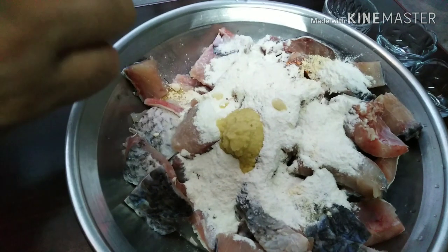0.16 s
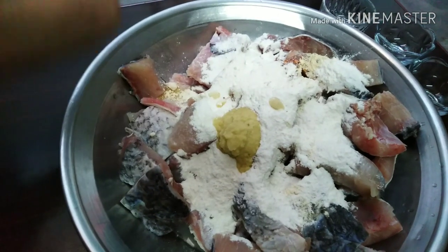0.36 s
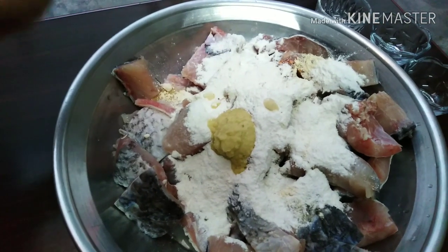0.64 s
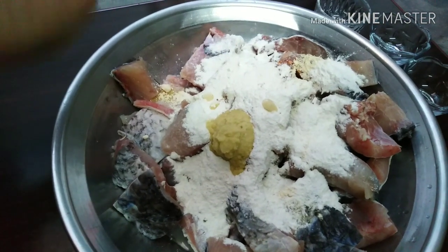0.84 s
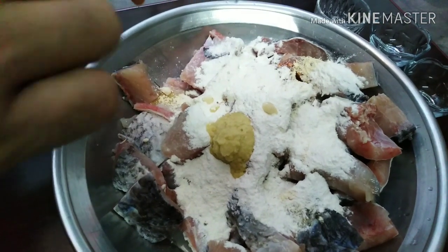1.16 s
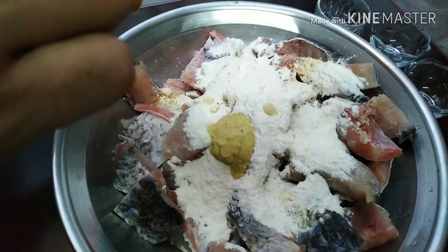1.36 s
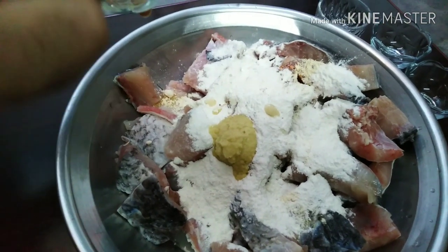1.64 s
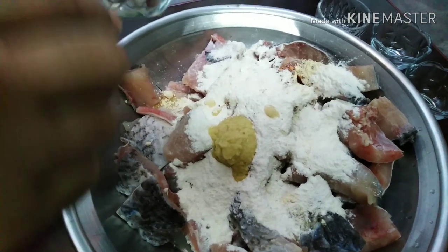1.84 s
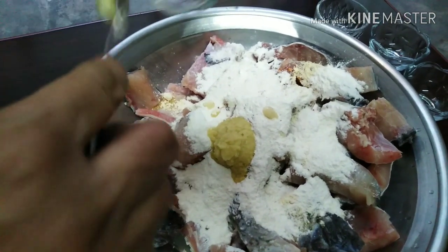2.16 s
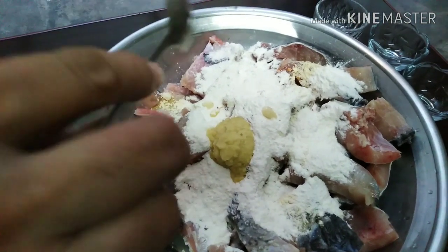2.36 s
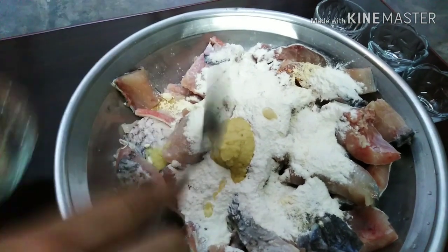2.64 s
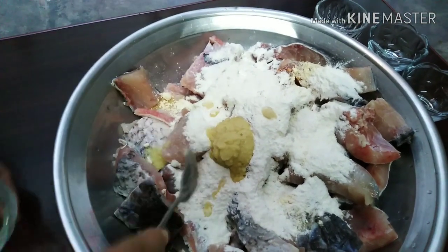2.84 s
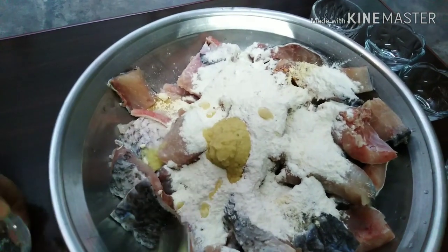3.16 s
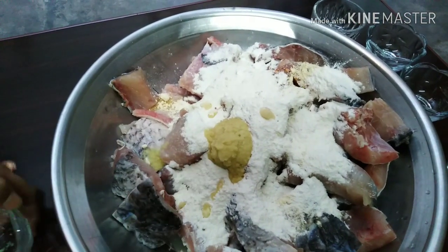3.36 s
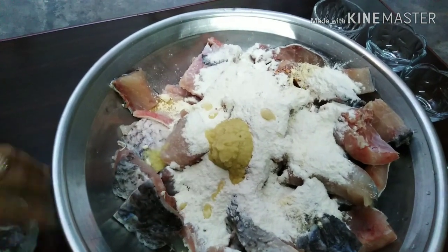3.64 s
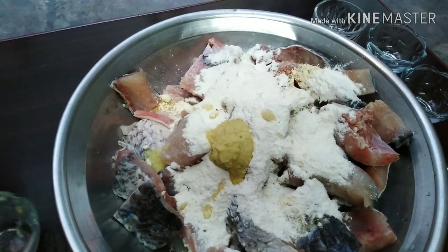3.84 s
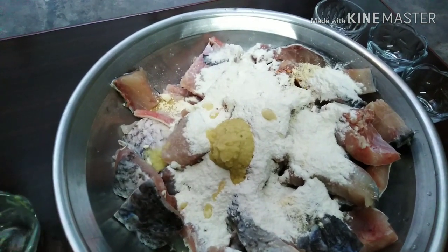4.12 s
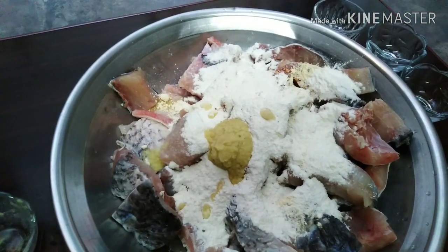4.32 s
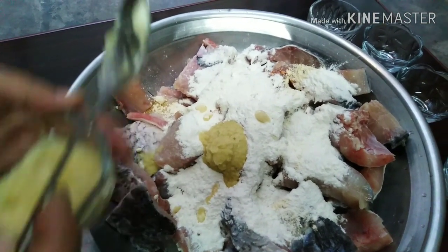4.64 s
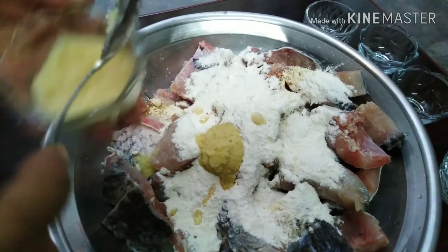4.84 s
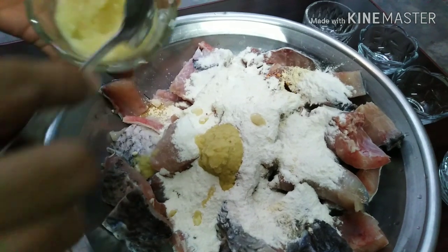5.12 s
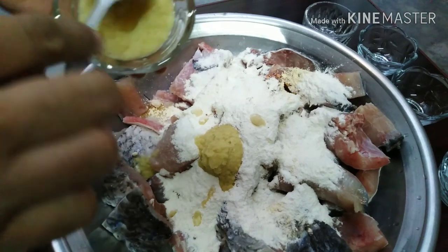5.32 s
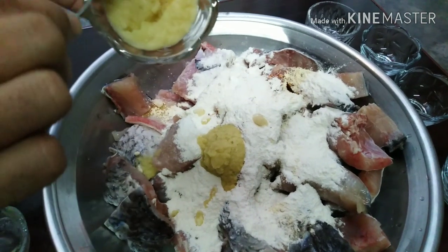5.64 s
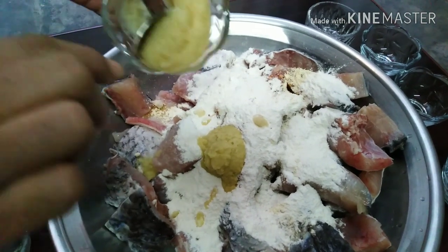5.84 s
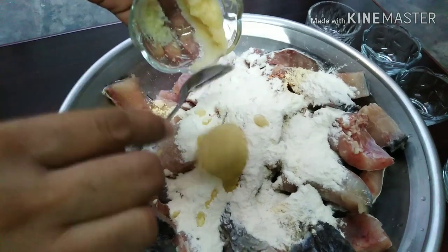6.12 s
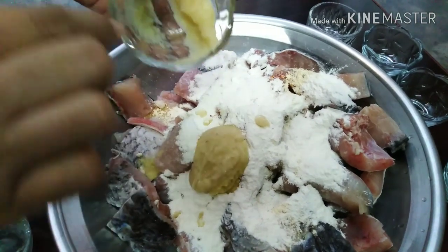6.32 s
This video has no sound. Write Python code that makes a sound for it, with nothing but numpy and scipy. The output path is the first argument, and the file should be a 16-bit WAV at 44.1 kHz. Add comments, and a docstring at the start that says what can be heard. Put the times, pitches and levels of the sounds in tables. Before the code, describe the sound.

A close microphone in a hard-walled kitchen picks up soft hiss, a low electrical hum and very faint passing tones. From the start until about 2.1 seconds, a steel spoon clinks on a small hand-held glass bowl around eight times, three or four per second. Each clink is bright and short, damped by fingers, with a little room echo, and sits somewhat to the right. After a quiet second, a light bump comes at 3.2 seconds. At 3.4 a vessel is set down on the table with a hollow knock, then rocks in quickening knocks until it rests at about 4.2. Following another pause, the spoon clinks on a fuller glass bowl at 5.2 and 5.4 seconds, trailing off in tiny ticks. A faint tick at 6.1 leads to one last sharp clink at about 6.3 seconds.

```python
"""A hard-walled kitchen, close to a two-port microphone.
A steel spoon clinks on a small hand-held glass bowl, later on a fuller one; each contact rings
glass and steel. Midway a vessel is set down on the table, knocks and rocks to rest.
A mains hum, a soft hiss and faint narrow tones that come and go fill the quiet."""
import sys
import numpy as np
from scipy import signal
from scipy.fft import rfft, irfft, next_fast_len
from scipy.io import wavfile
from scipy.ndimage import uniform_filter1d, map_coordinates

SR = 44100
rng = np.random.default_rng(int(sys.argv[2]) if len(sys.argv) > 2 else 0)


def wav_out(sig):
    """Save sig, one row per channel (or a flat mono array), as 16-bit PCM at SR to the path in sys.argv[1]."""
    wavfile.write(sys.argv[1], SR, np.round(np.clip(np.atleast_2d(sig).T, -1, 1) * 32767).astype(np.int16))


N = 285768

# kitchen decay: freq_hz, t60_s
ROOM_DECAY = [(150, .5), (500, 0.65), (1500, .5), (4000, .55), (9000, 0.52), (14000, 0.48)]
# reverb colour: freq_hz, gain_db
WALL_COLOUR = [(150, 10), (1000, 1.5), (4000, 2), (9000, -3), (14300, -5.5), (14600, -23.5)]
# left-right likeness of diffuse sound: freq_hz, coherence
COHERENCE = [(60, 1), (140, .98), (280, 0.64), (950, 0.11), (3770, 0.095), (15000, 0.069)]
# hiss spectrum: freq_hz, density_db
HISS_SPECTRUM = [(15, -48), (25, -21), (103, -0.5), (146, -9), (219, -2), (1310, -22), (1580, -20),
                 (1810, -17.5), (4750, -28.5), (7480, -32), (9020, -26), (13800, -32.5), (15000, -46.5)]
# faint tones: centre_s, pitch_hz, half_length_s, level_db
TONE_SWELLS = [(0.163, 650, 0.14, -69), (0.3, 746, 0.11, -65.5), (0.577, 214, 0.038, -57.5),
               (0.845, 473, 0.053, -66), (0.995, 682, .2, -71.5), (1.796, 472, 0.096, -60),
               (1.906, 460, 0.022, -59), (1.979, 720, 0.066, -64), (2.499, 206.7, 0.05, -61),
               (2.965, 1659, 0.14, -76.5), (4.485, 466, 0.034, -60), (4.558, 551, 0.037, -62.5),
               (4.7, 668, 0.17, -72), (2.026, 465, 0.07, -65), (2.482, 678, .1, -76),
               (4.92, 199, 0.043, -62.5), (4.832, 465, 0.095, -63), (5.03, 192.4, 0.047, -61),
               (5.231, 760, .12, -61), (5.47, 710, 0.11, -67), (6.454, 655, 0.1, -65)]
# tone position by pitch: pitch_hz, left_over_right_db
TONE_PAN = [(200, -13), (465, 10.5), (550, 10.5), (660, -13.5), (760, -19.5), (1600, 3)]
# vessel on table: start_s, level_db, boom_over_knock_db, clatter_over_knock_db,
# clatter_tilt_db_per_octave, contact_s
VESSEL_KNOCKS = [(3.182, -23, 6.5, -39.5, -1, 0.04), (3.444, -7, 2.5, -7.5, 2.5, 0.045),
                 (3.539, -19.5, -3.5, -14, 0.5, 0.022), (3.622, -23, -3, 1, 4, 0.038),
                 (3.693, -9.5, 0, -12.5, -2, 0.03), (3.782, -5.5, -2, -13.5, -0.5, 0.035),
                 (3.859, -11.5, -2, -17.5, -2, 0.033), (3.898, -20.5, -2, -17.5, 1, 0.021),
                 (3.943, -8.5, -2.5, -16, 0.2, 0.04), (4.004, -6.5, -2.5, -17.5, -1.5, 0.03),
                 (4.054, -8.5, -3.5, -19, -2, 0.039), (4.1, -11.5, -3, -18, -3, 0.035),
                 (4.143, -9.5, -4, -24.5, -2, 0.025), (4.175, -10.5, -4, -15, -4.5, 0.031),
                 (4.191, -14, -1.5, -14, -3.5, 0.02)]
# table resonances: centre_hz, width_hz, gain_db
TABLE_MODES = [(104.3, 48, -11.5), (154, 13, 0), (230, 81, 0.5), (320, 150, -4), (414.8, 35, 0.5),
               (635.4, 130, -6)]
# vessel resonances: centre_hz, width_hz, gain_db
VESSEL_MODES = [(826.7, 120, -8.5), (1010, 99, -5), (1277, 97, -11), (1600, 200, -15.5)]
# clatter spectrum: freq_hz, density_db
CLATTER_SPECTRUM = [(880, -11), (1500, -4), (2100, 2.5), (3060, -1), (4550, -13.5), (10900, -22),
                    (14600, -29), (16000, -82.5)]
# spoon on bowl: start_s, level_db, left_over_right_db, glass_over_spoon_db, lowest_glass_mode_db,
# lowest_spoon_band_db, tilt_db_per_octave
SPOON_CONTACTS = [(0.068, -13, -11.5, 2, -3.5, -5, -1.7), (0.256, -8, -11.5, 3, 4.5, -14, 0.5),
                  (0.4305, -1, -3, 0.5, -3, -2.5, 0.74), (0.739, -10, -13, -13.5, -7, 2, -3.5),
                  (1.03, -3.5, -9.5, -12, -1.5, 3, -2), (1.298, -6.5, 0, 4.5, -7.5, -7.5, -0.1),
                  (1.5648, -2, -8.5, -3, -6, -1.2, 0), (1.801, -54.5, -7, 13, 9.5, 0.1, 4.5),
                  (1.9054, -49.5, -6, -0.1, 23, 4, 9), (2.0889, -5, -10.5, -1, -3.5, -18, -1),
                  (2.291, -39.5, -11, -4, 0.8, 0.3, 16.5), (5.154, -10, -13.5, 3, -3, 10, 1.8),
                  (5.1682, -10.5, -9.5, 1, -1.7, 11, -1), (5.3751, -13, -15, 3, -2.5, -25, -1),
                  (5.412, -26, -10, -12, 8, -10.5, -5), (5.4974, -45.5, -20, 0.5, 7, 5.5, 1),
                  (5.5442, -32.5, -14, -6, 0.1, -3, 2), (5.6034, -56, -11, -1, 0.1, 0.1, 12),
                  (5.7244, -52, -11, -9, 0.1, 0.1, 7.5), (5.7916, -53.5, -11.5, -10, 0.1, 0.1, 18),
                  (6.1122, -29, -10.5, -12, -6, -6.5, 5.5), (6.337, -3.5, -5.5, 0, -9.5, -20, 1.35)]
# finger-damped glass modes: first_bowl_hz, fuller_bowl_hz, level_db, t60_s
BOWL_MODES = [(2740, 2650, -14, 0.03), (5740, 5630, -6, 0.014), (9600, 9530, -7, 0.011),
              (12600, 12500, -13, 0.008), (14200, 14200, -12, 0.006)]
# dense mode bands of the gripped, paste-laden spoon: low_hz, high_hz, level_db, t60_s
SPOON_BANDS = [(760, 920, -42, 0.04), (1197, 2400, -26.5, 0.016), (2780, 4000, -25.5, 0.0095),
               (4340, 5900, -20, 0.0092), (6610, 9100, -19.5, 0.014), (10000, 15000, -19, 0.011)]
# port imbalance: freq_hz, left_over_right_db
PORT_BALANCE = [(60, -.5), (400, .3), (800, -2), (2400, -2), (4400, 0), (8100, -7), (15000, -10)]
# microphone response: freq_hz, gain_db
MIC_RESPONSE = [(30, 0.5), (90, 5), (14300, 0.5), (15000, -14), (16000, -18.5), (16480, -37.5)]

HISS_DB, PATCHY_DB = -71.5, 3.5
HUM_HZ, HUM_DB = 98.7, -74.5
FLUTTER_DB, FLUTTER_PER_S = 6, 65
BOOM_DB, KNOCK_DB, CLATTER_DB = 4, 12, 9
CLATTER_PIVOT_HZ, CLINK_PIVOT_HZ = 3000, 6000
FULLER_BOWL_FROM_S, GLASS_SCATTER_DB = 4.8, 1.5
BAND_LIMIT_HZ = 16489


def amp(db):
    return 10 ** (np.asarray(db) / 20)


def unit_rms(x):
    return x / np.sqrt(np.mean(x ** 2) + 1e-20)


def along(points, hz):
    """Interpolate (freq_hz, value) points on a log axis."""
    knots_hz, values = np.transpose(points)
    return np.interp(np.log(hz + 1), np.log(knots_hz + 1), values)


def wobble(knots_per_s):
    """Smooth random curve, N samples."""
    knots = rng.standard_normal(int(N * knots_per_s / SR) + 4)
    return map_coordinates(knots, [np.arange(N) * knots_per_s / SR])


def filtered(x, response):
    """Apply a complex frequency response."""
    n = x.shape[-1]
    size = next_fast_len(n + 8192)
    return irfft(rfft(x, size) * response(np.fft.rfftfreq(size, 1 / SR)), size)[..., :n]


def highpass(x, corner_hz, order):
    return filtered(x, lambda hz: (1j * hz / (corner_hz + 1j * hz)) ** order)


def resonate(force, modes):
    """Drive parallel resonances of alternating sign."""
    return filtered(force, lambda hz: sum(
        (-1) ** k * amp(db) * 1j * hz * width_hz / (centre_hz ** 2 - hz ** 2 + 1j * hz * width_hz)
        for k, (centre_hz, width_hz, db) in enumerate(modes)))


def ring(hz, db, t60_s, t):
    """One decaying mode."""
    return amp(db - 60 * t / t60_s) * np.sin(2 * np.pi * hz * t) * (1 - np.exp(-t / 0.00035))


def add_in_kitchen(out, start_s, sound, pan_db, left_lag_s, room_db, tail_s):
    """Add the direct sound at both ports and a fresh diffuse tail off the walls."""
    hz, t, noise = signal.stft(rng.standard_normal((2, SR // 2)), SR, nperseg=256)
    coherence = np.clip(along(COHERENCE, hz), 0, 1)[:, None]
    noise[1] = coherence * noise[0] + np.sqrt(1 - coherence ** 2) * noise[1]
    fall_db = 60 * t / along(ROOM_DECAY, hz)[:, None] + 20 * (t / tail_s) ** 6
    tail = signal.istft(noise * amp(along(WALL_COLOUR, hz)[:, None] - fall_db), SR, nperseg=256)[1]
    tail = np.pad(tail / np.linalg.norm(tail[0]), ((0, 0), (round(0.0027 * SR), 0)))  # first wall
    pair = amp(room_db) * signal.fftconvolve(sound[None], tail, axes=1)
    lag = round(left_lag_s * SR)
    pair[0, lag:lag + len(sound)] += amp(pan_db / 2) * sound
    pair[1, :len(sound)] += amp(-pan_db / 2) * sound
    out[:, round(start_s * SR):][:, :pair.shape[1]] += pair


def hiss():
    """Noise, patchy in time and frequency, near mono in the bass."""
    def mid_side_gain(hz):
        angle = np.arccos(np.clip(along(COHERENCE, hz), -1, 1)) / 2
        return amp(along(HISS_SPECTRUM, hz)) * [np.cos(angle), np.sin(angle)]

    spectra = signal.stft(rng.standard_normal((2, N + 512)), nperseg=512)[2]
    patches = uniform_filter1d(rng.standard_normal(spectra.shape[1:]), size=3, axis=0)
    patches = uniform_filter1d(patches, size=10, axis=1)
    noise = signal.istft(spectra * amp(PATCHY_DB * unit_rms(patches)), nperseg=512)[1][:, :N]
    mid, side = filtered(noise, mid_side_gain)
    return amp(HISS_DB) * unit_rms(np.array([mid + side, mid - side]))


def mains_hum():
    """One low tone, unsteady in level and phase."""
    t = np.arange(N) / SR
    return amp(HUM_DB + 4 * wobble(18)) * np.sin(2 * np.pi * HUM_HZ * t + 1.1 * wobble(9))


def faint_tones():
    """Narrow, fluttering tones that swell and fade."""
    out, t = np.zeros((2, N)), np.arange(N) / SR
    waver_rad = .7 * wobble(90)
    flutter = amp(FLUTTER_DB * wobble(FLUTTER_PER_S))
    for centre_s, hz, half_s, db in TONE_SWELLS:
        span = slice(max(round((centre_s - half_s) * SR), 0), round((centre_s + half_s) * SR))
        envelope = np.exp(-(1.3 * (t[span] - centre_s) / half_s) ** 4 - .6) * flutter[span]
        gains = amp(db + np.array([[.5], [-.5]]) * along(TONE_PAN, hz))
        out[:, span] += gains * envelope * np.sin(2 * np.pi * hz * t[span] + waver_rad[span])
    return out


def rocking_vessel():
    """Blow, rebound and chatter drive the table's boom and the vessel's knock; the base clatters."""
    out, t = np.zeros((2, N + SR)), np.arange(SR // 6) / SR
    grit_db = 4 * wobble(300)  # uneven scraping
    for start_s, db, boom_db, clatter_db, db_per_octave, contact_s in VESSEL_KNOCKS:
        chatter = rng.standard_normal((3, len(t))) * amp(-20 * (t / contact_s) ** 2)
        force = chatter[:2].copy()
        force[:, 0] += amp(25)  # blow
        force[:, round(rng.uniform(.008, .011) * SR)] += amp(21)  # rebound
        boom = amp(BOOM_DB + boom_db) * resonate(force[0], TABLE_MODES)
        knock = amp(KNOCK_DB) * resonate(force[1], VESSEL_MODES)
        scrape_db = grit_db[round(start_s * SR):][:len(t)] - 8 * t / contact_s
        scrape = chatter[2] * (1 - np.exp(-t / 0.0033)) * amp(scrape_db)
        clatter = amp(CLATTER_DB + clatter_db) * filtered(scrape, lambda hz: amp(
            along(CLATTER_SPECTRUM, hz) + db_per_octave * np.log2((hz + 1) / CLATTER_PIVOT_HZ)))
        # the table radiates little deep bass
        sound = amp(db) * highpass(boom + knock + clatter, corner_hz=110, order=2)
        add_in_kitchen(out, start_s + 0.0035, sound, pan_db=-.6,
                       left_lag_s=.0002, room_db=-9, tail_s=0.35)
    return out[:, :N]


def glass_bowl(t, fuller, lowest_db, db_per_octave):
    """Finger-damped glass; each blow wakes each mode a little differently."""
    glass = 0
    for k, (first_hz, fuller_hz, db, t60_s) in enumerate(BOWL_MODES):
        detune, scatter = rng.standard_normal(2)
        hz = (fuller_hz if fuller else first_hz) * (1 + .003 * detune)
        db += lowest_db * (k == 0) + GLASS_SCATTER_DB * scatter
        glass += ring(hz, db + db_per_octave * np.log2(first_hz / CLINK_PIVOT_HZ), t60_s, t)
    return glass


def steel_spoon(t, lowest_db, db_per_octave, modes_per_band=13):
    """Dense, damped steel modes, shifted by grip and paste at each contact."""
    steel = 0
    for k, (low_hz, high_hz, db, t60_s) in enumerate(SPOON_BANDS):
        offset, polarity = rng.uniform(0, 1, (modes_per_band, 2)).T
        hz = low_hz + (high_hz - low_hz) * (np.arange(modes_per_band) + offset)[:, None] / modes_per_band
        modes_db = db + lowest_db * (k == 0) + db_per_octave * np.log2(hz / CLINK_PIVOT_HZ)
        steel += np.sign(polarity - .5) @ ring(hz, modes_db, t60_s, t)
    return steel


def spoon_clinks():
    """Blow and chatter ring the spoon, the blow alone the bowl. Each clink has its own brightness."""
    out, t = np.zeros((2, N + SR)), np.arange(SR // 12) / SR
    lead_in_s = .004  # faint rise before each clink
    blow = round(lead_in_s * SR)
    since_blow_s = t[:SR // 100] - lead_in_s
    lead_in_db = -32 + 4000 * since_blow_s
    chatter_db = -23.5 - 60 * since_blow_s / 0.029
    envelope = amp(np.where(since_blow_s < 0, lead_in_db, chatter_db))
    for start_s, db, pan_db, glass_db, low_glass_db, low_steel_db, db_per_octave in SPOON_CONTACTS:
        glass = glass_bowl(t, start_s > FULLER_BOWL_FROM_S, low_glass_db, db_per_octave)
        steel = steel_spoon(t, low_steel_db, db_per_octave)
        drive = rng.standard_normal(len(envelope)) * envelope
        drive[blow] = 1
        clink = np.convolve(steel, drive)
        clink[blow:blow + len(t)] += amp(glass_db + 3) * glass
        sound = amp(db) * highpass(clink, corner_hz=400, order=4)  # too small to radiate bass
        pan_db -= along(PORT_BALANCE, 9600)  # the ports add their own imbalance
        add_in_kitchen(out, start_s + 0.00049 - lead_in_s, sound, pan_db,
                       left_lag_s=0.00023, room_db=-13, tail_s=0.27)
    return out[:, :N]


def scene():
    return spoon_clinks() + rocking_vessel() + hiss() + mains_hum() + faint_tones()


def record(dry):
    """Left port duller than right; peaks saturate; treble rolls off toward the band limit."""
    ports = filtered(dry, lambda hz: amp(
        np.outer([.5, -.5], along(PORT_BALANCE, hz)) + along(MIC_RESPONSE, hz)))
    saturated = ports / (1 + np.abs(ports / .95) ** 6) ** (1 / 6)
    return filtered(saturated, lambda hz: hz < BAND_LIMIT_HZ)


dry = scene()
out = record(dry)
wav_out(out)
```